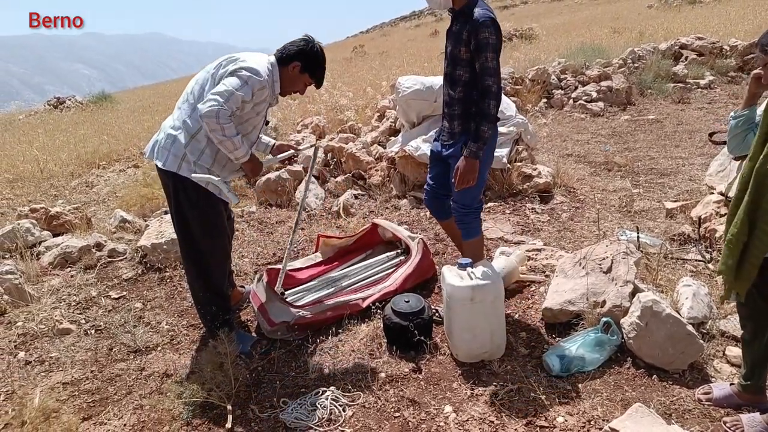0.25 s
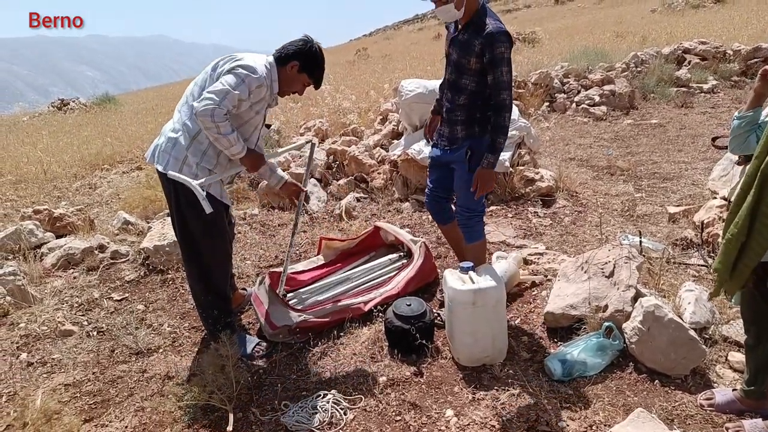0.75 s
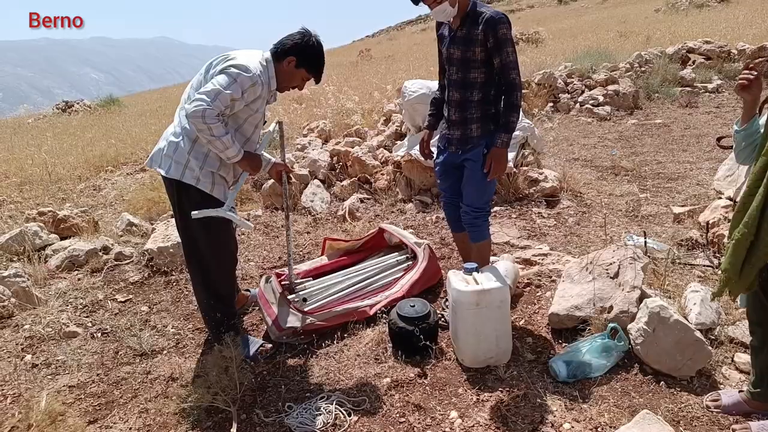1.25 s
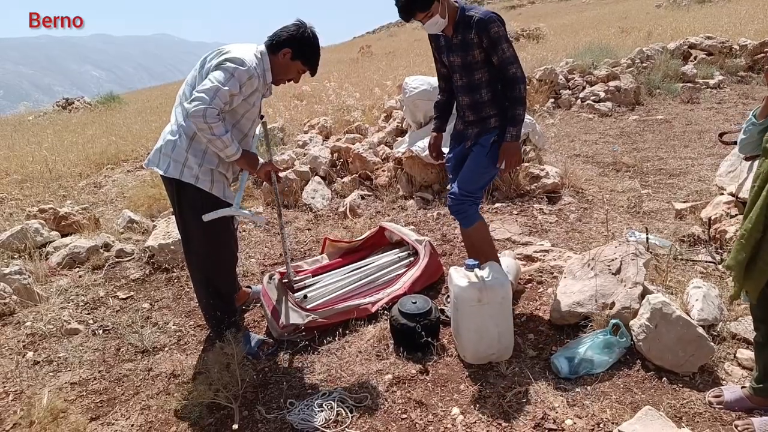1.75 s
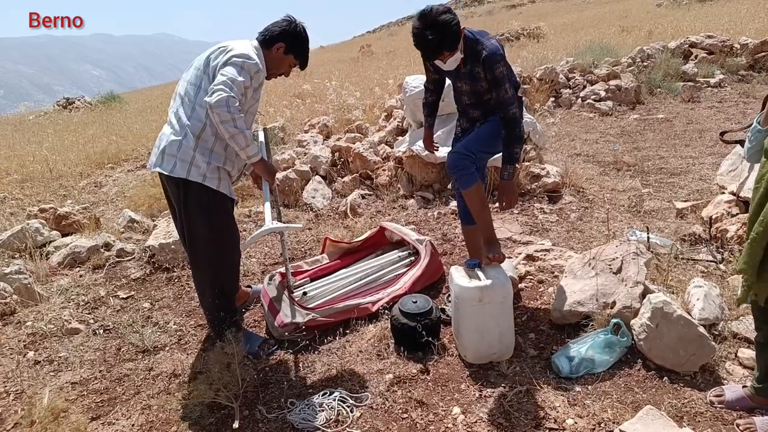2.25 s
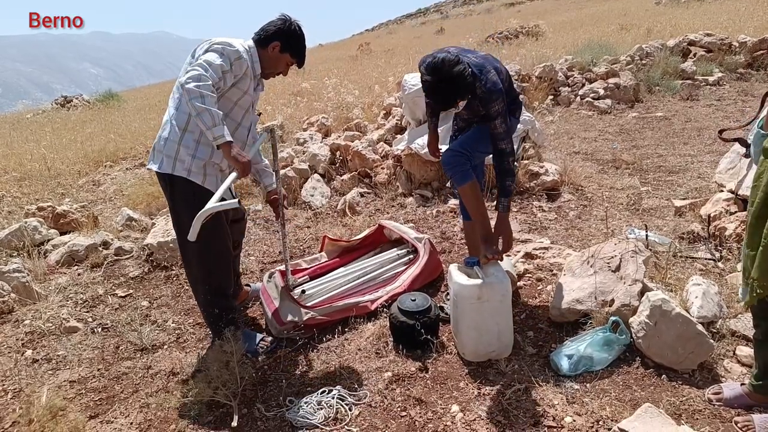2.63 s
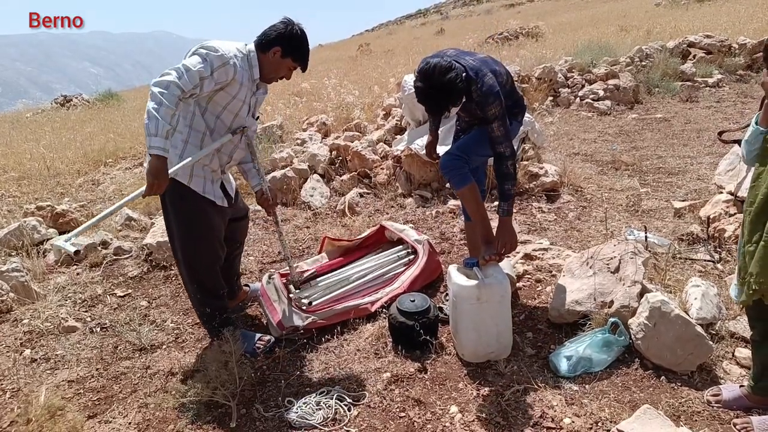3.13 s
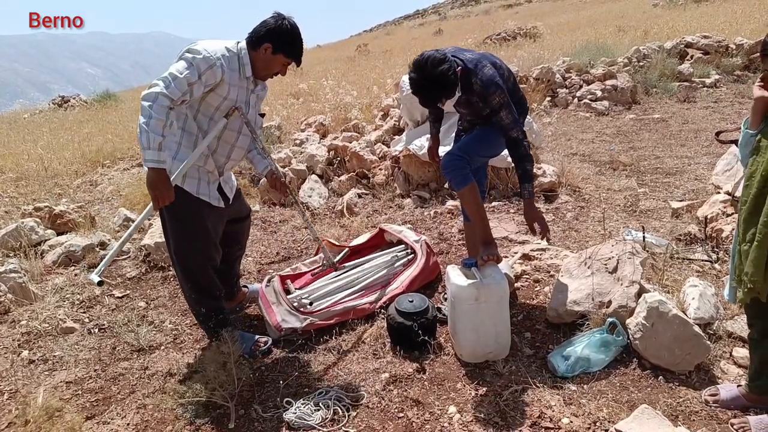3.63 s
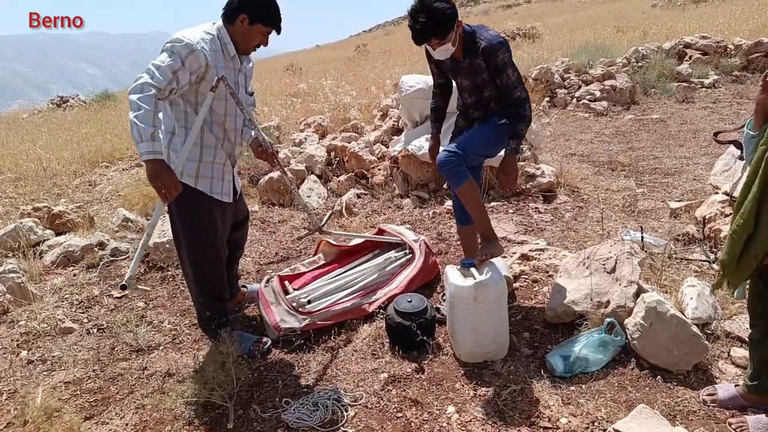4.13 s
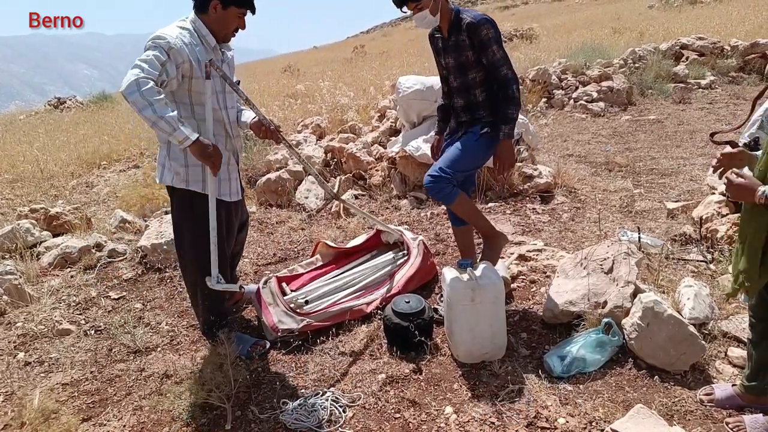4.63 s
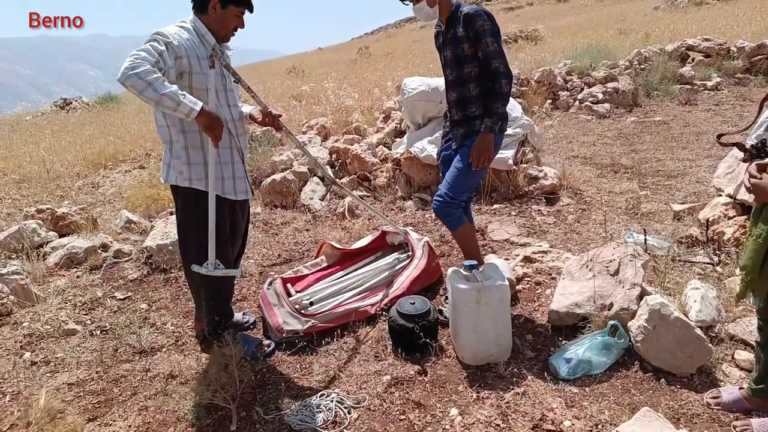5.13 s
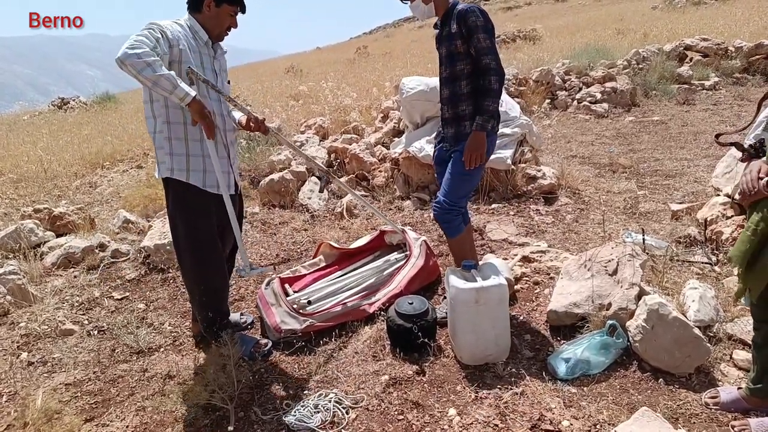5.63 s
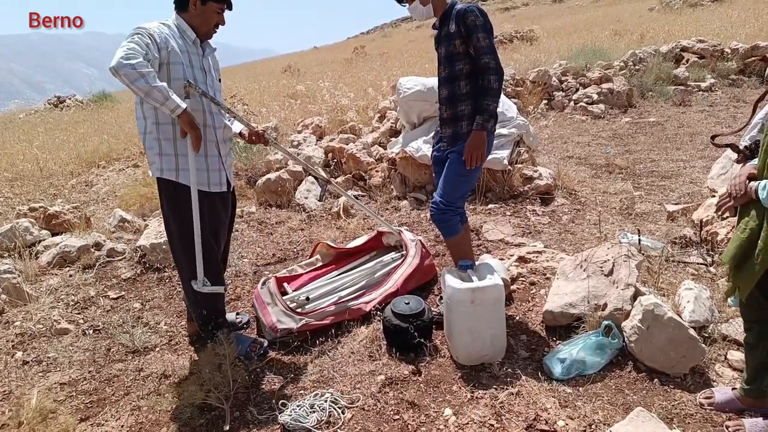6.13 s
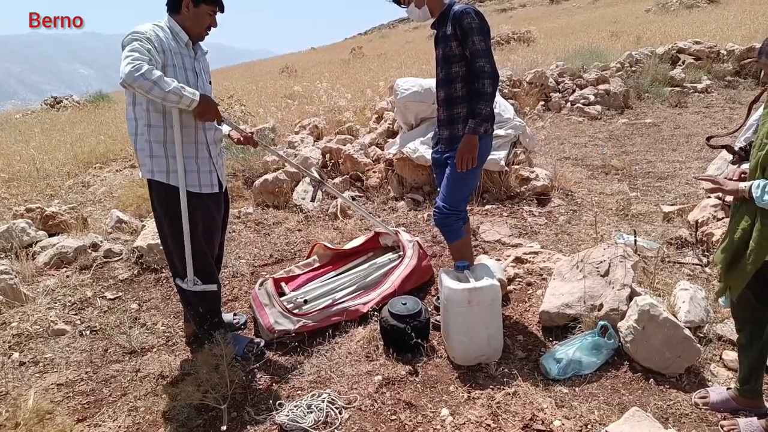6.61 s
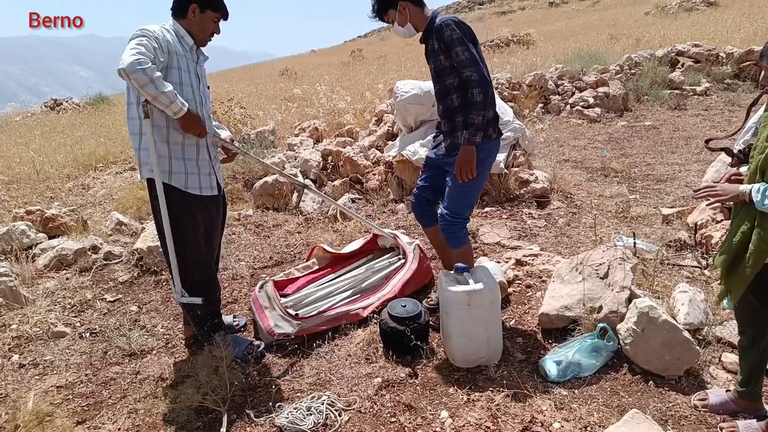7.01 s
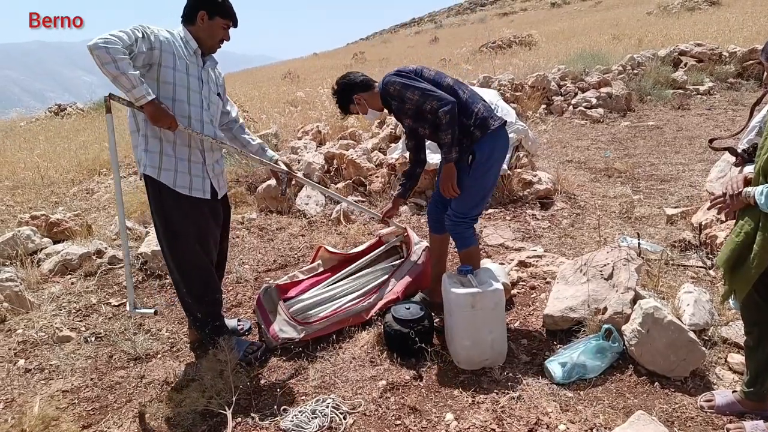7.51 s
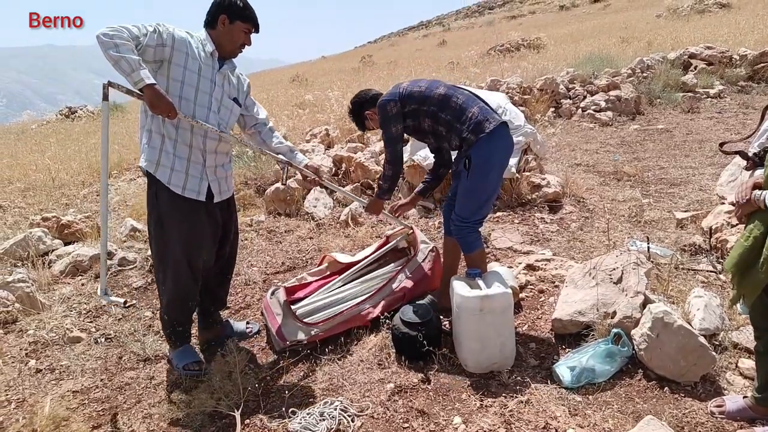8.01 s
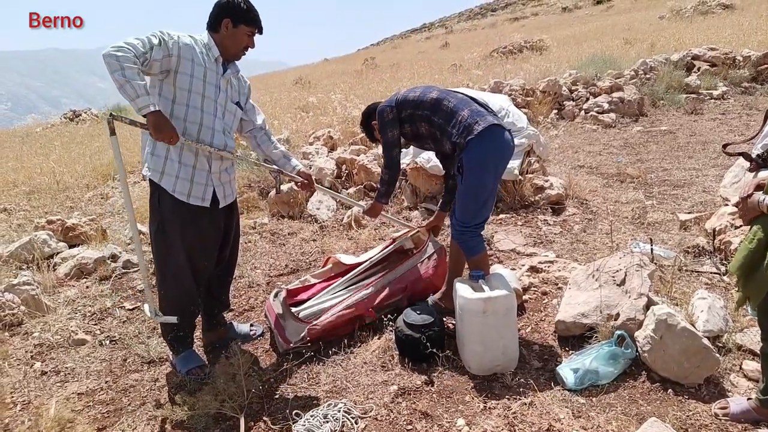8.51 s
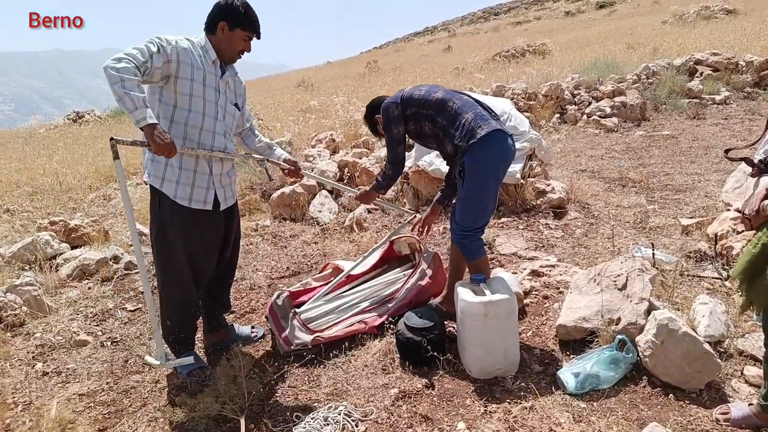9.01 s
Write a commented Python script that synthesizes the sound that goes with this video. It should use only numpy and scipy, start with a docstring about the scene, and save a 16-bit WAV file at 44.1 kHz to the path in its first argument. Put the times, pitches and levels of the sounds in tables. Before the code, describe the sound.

Hollow metal poles are handled on an open stony hillside, heard by a phone microphone nearby. At the start poles slide and rattle softly, with a clink at 0.2 s and a dull bump. Two bright knocks and a scrape come at 1.1-1.3 s, then a lighter clink at 1.6. Wind rumbles unevenly, thumping hardest around 2.3-2.4 s. At 3.0 s the loudest clank rings briefly, followed by a busy clatter and a sharp scrape until 3.65. Sparser clinks follow around 4.3; a high, thin tick at 5.0. Scrapes and bright clinks cluster from 5.5 to 6.1. Stalks snap at 6.3 as tubes squeak faintly, squeaking again near 7. A knock falls at 7.2, then dry crackles and dull bumps from 7.6 to 8.3, with light clinks and a last knock at 8.8. The wind calms, leaving faint rustle and a soft low bump near 9.

```python
"""On an open, stony hillside, hollow metal tent poles are drawn from a canvas bag and fitted together.
Knocks, rattles and scrapes set ringing filters of the tubes going; rubbed tubes squeak as wavering tones.
Dry stalks snap as short noise bursts, and dull bumps are dying bursts of low noise.
Wind buffets the two ports of a phone microphone as lumpy rumble and single thumps, over a faint rustle."""
import sys
import numpy as np
from scipy import signal
from scipy.io import wavfile

SR = 44100
rng = np.random.default_rng(int(sys.argv[2]) if len(sys.argv) > 2 else 0)


def digitize_waveform(pressure):
    """Quantize a signal to 16-bit integers and store it at the path in sys.argv[1].

    Rows of a 2-D input are taken as channels; values are limited to [-1, 1].
    """
    field = np.atleast_2d(pressure).T
    bounded = np.clip(field, -1, 1)
    quanta = np.round(bounded * 32767).astype(np.int16)
    wavfile.write(sys.argv[1], SR, quanta)


def undo_db(level):
    """Turn decibels back into plain size, where 20 dB means ten times bigger."""
    steps = np.asarray(level, float) / 20
    return 10 ** steps


N = 408366

# where the low, bright and top registers meet: edge_hz
REGISTER_EDGES_HZ = [4300, 8700]
# shift of the left port in the low, bright and top register, negative when it hears first: lag_samples
LEFT_LAG_SAMPLES = [-3, -2, -4]


def rms_one(x):
    """Scale to unit rms."""
    return x / np.sqrt(np.mean(x ** 2) + 1e-20)


def in_time(rows):
    """Columns of a curve table at every sample."""
    s, *columns = np.transpose(rows)
    return [np.interp(np.arange(N) / SR, s, column) for column in columns]


def at_hz(points, hz):
    """Read a spectrum on a log-frequency axis."""
    point_hz, point_db = np.array(points).T
    return np.interp(np.log(hz), np.log(point_hz), point_db)


def drift(rate_hz):
    """Slow random wandering around 0 with spread 1; a higher rate wanders faster."""
    r = np.exp(-80 * np.pi * rate_hz / SR)   # one step every 40 samples
    slow = signal.lfilter([1], [1, -2 * r, r * r], rng.standard_normal(N // 40 + 2002))[2000:]
    return np.interp(np.arange(N) / 40, np.arange(len(slow)), rms_one(slow - slow.mean()))


def band(low_hz, high_hz):
    """Band-pass filter sections."""
    return signal.butter(2, [low_hz, high_hz], "band", fs=SR, output="sos")


def mode(hz, t60):
    """One ringing mode as a filter section; it fades by 60 dB in t60 seconds."""
    r, w = undo_db(-60 / (t60 * SR)), 2 * np.pi * hz / SR
    return np.array([[0.024, np.sin(w), 0.036, 1, -2 * r * np.cos(w), r * r]])


def place(times, shapes):
    """Lay one short shape at each time."""
    starts = np.round(np.asarray(times) * SR).astype(int)
    at = (starts[:, None] + np.arange(shapes.shape[1])).ravel()
    return np.bincount(at, shapes.ravel(), N + shapes.shape[1])[:N]


def grit(spread_db, shape):
    """Dense uneven micro-contacts; rms 1."""
    unevenness = np.minimum(rng.exponential(1, shape), 4)
    return rms_one(rng.standard_normal(shape) * undo_db(spread_db * unevenness))


def to_ports(near, register, scatter_db, t60, pan_db=0):
    """Direct sound a few samples apart, plus each port's own scatter off the stones, changing as poles move."""
    moves_hz, move_rad = 1.5, 2.5   # how fast and how far the echo paths change
    t = np.arange(SR // 10) / SR
    stones = rng.standard_normal((2, 2, len(t))) * undo_db(-60 * t / t60)
    stones *= undo_db(scatter_db) / np.sqrt(np.sum(stones ** 2, axis=2, keepdims=True))
    direct = np.array([np.roll(near, LEFT_LAG_SAMPLES[register]), near])
    # the echo turns back and forth between two sets of paths
    turn = move_rad * drift(moves_hz)
    here = signal.oaconvolve((near * np.cos(turn))[None], stones[0], axes=1)[:, :N]
    there = signal.oaconvolve((near * np.sin(turn))[None], stones[1], axes=1)[:, :N]
    pan = undo_db([[pan_db / 2], [-pan_db / 2]])
    return (direct + here + there) * pan / np.hypot(1, undo_db(scatter_db))


def port_step(below, above):
    """The port resonance ends sharply: what lies under it is cut at its edge, the top starts just above."""
    edge = REGISTER_EDGES_HZ[1]
    cut = signal.sosfilt(signal.ellip(8, 1, 40, edge - 250, fs=SR, output="sos"), below)
    return cut + signal.sosfilt(signal.cheby2(4, 14, edge, "high", fs=SR, output="sos"), above)


def rubbing(flutter_db, top_db):
    """Force of sliding, rattling and scraping in the three registers."""
    # poles sliding in the bag and in the hands: time_s, bright_db
    sliding = [(0.0, -48), (0.15, -52), (0.62, -63), (1.03, -75), (1.19, -52.5), (1.83, -67), (2.4, -72),
               (2.55, -61.5), (2.82, -71), (3.12, -53), (3.74, -60.5), (5.9, -61), (6.22, -52.5),
               (6.86, -63.5), (7.09, -56), (7.66, -58), (9.26, -60.5)]
    # short scrapes of tube along tube, swelling and fading: middle_s, bright_db, low_db, half_length_s
    scrapes = [(0.287, -50.5, -54, 0.11), (1.149, -39.5, -44, 0.093), (1.326, -45, -52, 0.07),
               (3.531, -33, -32.5, 0.027), (5.488, -43.5, -60, 0.025), (5.561, -46, -83, 0.023),
               (5.629, -48.5, -58, 0.014), (5.884, -39, -44, 0.025), (5.982, -34, -45, 0.021),
               (6.033, -42, -46, 0.087), (6.411, -39, -64, 0.039), (7.494, -46, -59, 0.068),
               (7.971, -42.5, -52, 0.023), (8.035, -48, -49.5, 0.1)]
    slide_low_db = -6   # low register against bright
    # loose poles tick while they slide: this often at the mean sliding level, more often the harder
    rattles_per_s, rate_db_per_db = 12, 1
    rattle_db, rattle_spread_db, rattle_t60_s = -7, 6, 0.099   # levels against the sliding

    slide_db, = in_time(sliding)
    chance = rattles_per_s * undo_db(rate_db_per_db * (slide_db - slide_db.mean())) / SR
    ticks = rng.random((2, N)) < chance
    tick_db = rattle_db + rattle_spread_db * np.minimum(rng.exponential(1, (2, N)), 3)
    fade = undo_db(-60 / (rattle_t60_s * SR))
    rattle = 1 + signal.lfilter([1], [1, -fade], ticks * undo_db(tick_db) + 1e-18)
    steady_bright, steady_low = undo_db(slide_db + [[0], [slide_low_db]]) * rattle

    middle, bright_db, low_db, half = np.transpose(scrapes)
    t = np.arange(SR // 2) / SR
    swell = np.exp(-((t - 2 * half[:, None]) / half[:, None]) ** 2)
    bright = steady_bright + place(middle - 2 * half, swell * undo_db(bright_db)[:, None])
    low = steady_low + place(middle - 2 * half, swell * undo_db(low_db)[:, None])
    flutter = undo_db(flutter_db * drift(39.6))   # the grip on the tubes is unsteady
    return [low * flutter, bright * flutter, bright * flutter * undo_db(top_db)]


def tube_body(crack_db, twin):
    """Tube filters as (Hz, sections, gain, is a ring); unit noise gives rms 1 in each register."""
    # rings of the tubes: pitch_hz, gain_db, t60_s
    rings = [(636, -7, 0.0214), (1180, -8.5, 0.076), (1268, -1.5, 0.028), (1621, -11, 0.075),
             (1803, -1.5, 0.021), (2330, -9, 0.085), (2473, -18, 0.049), (2778, -10, 0.14),
             (2825, -5.5, 0.023), (3450, -9.5, 0.092), (4040, -18, 0.41), (4680, -11.5, 0.18),
             (6210, -7, 0.16), (6638, 7, 0.036), (7160, 5, 0.052), (7440, 5.5, 0.034), (8420, 5, 0.035)]
    # crowded short modes of the tube walls, heard as a crack: pitch_hz, density_db (per Hz, relative)
    crack = [(500, -16), (870, -46), (1200, -13), (1500, -32.5), (2500, -2), (3700, -8), (7000, 1.5),
             (8300, -7.5), (9500, -26), (15500, -31.5)]
    body = []
    for hz, db, t60 in rings:
        # the two tubes that touch are not quite alike, so every ring has a close twin
        for detune in (1, 1 + twin):
            body.append((hz, mode(hz * detune, t60), undo_db(db), 1))
    edges = np.r_[np.geomspace(450, REGISTER_EDGES_HZ[1], num=13), 11000, 13500, 17000]
    for a, b in zip(edges, edges[1:]):
        middle_hz = np.sqrt(a * b)
        body.append((middle_hz, band(a, b), undo_db(at_hz(crack, middle_hz) + crack_db), 0))

    click, power = signal.unit_impulse(SR // 2), np.zeros(3)
    for hz, sos, gain, ring in body:
        power[np.searchsorted(REGISTER_EDGES_HZ, hz)] += np.sum((gain * signal.sosfilt(sos, click)) ** 2)
    return [(hz, sos, gain / np.sqrt(power[np.searchsorted(REGISTER_EDGES_HZ, hz)]), ring)
            for hz, sos, gain, ring in body]


def poles(crest_db, chance_db, favour_db, favour_width, chatter_t60, slide_ring_db):
    """Knocks and sliding shake the same tubes; the spot struck favours one ring and those an octave away."""
    # pole on pole: time_s, peak_db (bright register), low_db (low register against peak), loudest_ring_hz
    knocks = [(0.184, -19, -30, 2660), (0.9881, -30.5, -15, 2756), (1.076, -15, -27, 2780),
              (1.1627, -16, -13.5, 2850), (1.541, -39.5, -4, 2330), (1.586, -47, 2, 1800),
              (1.609, -45, -3, 1190), (1.6218, -25.5, -11.5, 2314), (1.668, -49.5, 1, 1196),
              (2.006, -35, -7, 1250), (2.187, -44, -9, 2360), (2.4907, -33.5, -26, 2760),
              (2.9576, -32.5, -10, 2330), (2.9957, -8.5, -17.5, 1621), (3.1783, -30.5, -8, 1184),
              (3.189, -28.5, -5, 2326), (3.2967, -21.5, -15.5, 1630), (3.4128, -27, -10.5, 1627),
              (3.451, -19.5, -14.5, 1800), (3.5455, -15, -12.5, 2825), (3.631, -24.5, -14.5, 1247),
              (3.922, -32.5, -25, 2850), (4.057, -45, -13.5, 6638), (4.3059, -28.5, -17.5, 1250),
              (4.3345, -33.5, -8.5, 1310), (4.69, -46, -40, 6638), (4.7784, -39, -21, 2830),
              (4.9569, -15.5, -54, 7440), (5.578, -35.5, -33, 7400), (5.842, -19.5, -62, 6320),
              (5.9316, -33, -18, 2825), (6.076, -30, -24, 2330), (6.11, -27, -22.5, 2825),
              (7.031, -49.5, -9.5, 1180), (7.116, -40, -13, 3390), (7.2195, -21, -16, 1100),
              (7.4526, -29, -27.5, 2700), (7.618, -38.5, -15.5, 1790), (7.764, -34, -18, 3000),
              (7.997, -26, -38, 2830), (8.1177, -32, -14, 3450), (8.8166, -28, -14.5, 2820)]
    # light taps that part sooner, with the same columns: time_s, peak_db, low_db, loudest_ring_hz
    taps = [(0.118, -36, -7.5, 2473), (3.151, -50, 4.5, 1803), (3.348, -46, 0, 1621),
            (3.485, -36, -5.5, 1180), (3.9, -57.5, 5, 1180), (3.999, -48.5, -1, 2825),
            (4.889, -38.5, -8, 2825), (5.2827, -51, 4, 2825)]
    tap_t60_s = 0.031
    # a glancing knock has little low ring and much top, up to a limit against the peak
    top_db, top_per_low, top_most_db = -38.5, 0.81, -19
    slide_tilt_db = 5   # sliding wakes deep sounds less than a blow: dB an octave below the bright register

    s, peak_db, low_db, spot_hz = np.transpose(list(knocks) + list(taps))
    top_re_peak_db = np.minimum(top_db - top_per_low * low_db, top_most_db)
    knock_db = [peak_db + low_db, peak_db - crest_db, peak_db + top_re_peak_db]
    slide = rubbing(flutter_db=2.24, top_db=-14.5)

    # first contact, chatter, then the bundle settles more slowly
    t = np.arange(SR // 6) / SR
    lasts = np.repeat([chatter_t60, tap_t60_s], [len(knocks), len(taps)])[:, None]
    first_contact = 3.03 * undo_db(-60 * t / 0.0004)
    chatter = first_contact + undo_db(-60 * t / lasts) + undo_db(-21 - 60 * t / (6.86 * lasts))

    contacts = grit(3.0, (3, N))
    # the sliding spot wakes other rings as it moves
    shifting = [undo_db(slide_ring_db + 4.5 * drift(9.9)) for group in range(4)]
    out = np.zeros((3, N))
    for k, (hz, sos, gain, ring) in enumerate(tube_body(crack_db=39.5, twin=0.0231)):
        register = np.searchsorted(REGISTER_EDGES_HZ, hz)
        near_spot = sum(np.exp(-(np.log(hz / spot_hz / octave) / favour_width) ** 2) for octave in (.5, 1, 2))
        ring_db = chance_db * rng.standard_normal(len(s)) + favour_db * near_spot
        blows = place(s, chatter * undo_db(knock_db[register] + ring * ring_db)[:, None])
        tilt = undo_db(slide_tilt_db * min(np.log2(hz / REGISTER_EDGES_HZ[0]), 0))
        sliding = slide[register] * tilt * (shifting[k // 2 % 4] if ring else 1)
        out[register] += signal.sosfilt(sos, gain * (blows + sliding) * contacts[k % 3])

    low = to_ports(out[0], register=0, scatter_db=-7, t60=0.05, pan_db=1.5)
    bright = to_ports(out[1], register=1, scatter_db=2, t60=.04, pan_db=0)
    top = to_ports(out[2], register=2, scatter_db=39.0, t60=0.045, pan_db=2.5)
    return port_step(low + bright, top)


def port_gains(level_db, pan_db):
    """Levels at two unrelated ports whose mean has the given level."""
    left = 2 * undo_db(level_db) / np.sqrt(1 + undo_db(-2 * pan_db))
    return np.array([left, left * undo_db(-pan_db)])


def thump(hz, cycles):
    """A few swelling and fading cycles, one row a pitch."""
    turns = np.arange(SR // 8) / SR * hz[:, None]
    return np.sin(2 * np.pi * turns) * np.sin(np.pi * np.clip(turns / cycles, 0, 1)) ** 2


def wind(lumps_db, cycles, brighten):
    """Lumpy rumble, own in each port and brighter in gusts, and single strong eddies that thump."""
    # strength on the ports: time_s, level_db
    strength = [(0.0, -50.5), (0.13, -54.5), (0.8, -41.5), (1.0, -43), (1.75, -49), (1.88, -40),
                (2.14, -47), (2.37, -38), (2.73, -56.5), (3.43, -40), (4.9, -63.5), (5.03, -44), (5.2, -50),
                (5.42, -58.5), (5.6, -74.5), (6.35, -56.5), (6.85, -68.5), (7.35, -44), (7.58, -57),
                (8.4, -59), (8.95, -54), (9.26, -64)]
    # eddies on one port: start_s, peak_db (about, mean of the ports), pitch_hz, port (0 left, 1 right)
    puffs = [(0.036, -26.5, 130, 0), (1.405, -30, 117, 1), (1.84, -31, 240, 1), (2.292, -20.5, 219, 1),
             (2.43, -25, 187, 1), (0.702, -27, 173, 1), (2.387, -18.5, 205, 1), (3.635, -29, 205, 1),
             (5.013, -27, 135.5, 0), (7.408, -31, 148, 1), (7.874, -33.5, 138, 1)]
    # the right port faces the wind: left-right dB falls with strength above calm, and veers
    calm_db, lean_per_db, veer_db = -71, 0.49, 5.5
    # stronger wind is brighter: dB an octave per dB above the mean
    mean_wind_db, brighter_per_db = -45, 0.22

    level_db, = in_time(strength)
    pan_db = veer_db * drift(0.32) - lean_per_db * np.maximum(level_db - calm_db, 0)
    rumble, gusts = np.zeros((2, N)), np.array([drift(7.2), drift(32.4)])
    for low_hz, high_hz, band_db in [(68.3, 138.3, 1), (115.6, 228.6, -4.0), (263, 324, -17.5)]:
        noise = signal.sosfilt(band(low_hz, high_hz), rng.standard_normal((2, N)))
        lumps = lumps_db * np.array([drift(9.7), drift(14.3)])
        octaves = np.log2(low_hz / 65)
        gust_db = (1.0 + brighten * octaves) * gusts
        brighter_db = brighter_per_db * octaves * (level_db - mean_wind_db)
        rumble += noise * undo_db(band_db + lumps + gust_db + brighter_db)
    out = rms_one(rumble) * port_gains(level_db, pan_db)

    s, peak_db, hz, port = np.transpose(puffs)
    eddies = 2 * thump(hz, cycles) * undo_db(peak_db)[:, None]   # doubled, as only one port has it
    return out + np.array([place(s, eddies * (np.round(port) == k)[:, None]) for k in range(2)])


def hillside_air(patchy_db):
    """Far rustle of grass and air: noise in narrow bands whose levels wander."""
    # open hillside: pitch_hz, density_db (per Hz, relative)
    air = [(250, -7.5), (823, -18), (1400, -25.5), (7240, -23), (8930, -37), (15100, -32)]
    air_db = -59.5   # rms of the whole rustle
    edges = np.r_[np.geomspace(200, REGISTER_EDGES_HZ[1], num=13), 12000, 17000]
    white, together, out = rng.standard_normal((2, N)), drift(0.46), np.zeros((2, N))
    for k, (a, b) in enumerate(zip(edges, edges[1:])):
        hz = np.sqrt(a * b)
        gain = undo_db(at_hz(air, hz) + patchy_db * (together + drift(20.0)))
        out[int(hz > REGISTER_EDGES_HZ[1])] += gain * signal.sosfilt(band(a, b), white[k % 2])
    below = to_ports(out[0], register=1, scatter_db=7.5, t60=0.025)
    above = to_ports(out[1], register=2, scatter_db=7.5, t60=0.025)
    return undo_db(air_db) * rms_one(port_step(below, above))


def thuds(low_hz, high_hz):
    """Dull bumps, a dying burst of low noise, reach both ports alike."""
    # bumps on ground or bag: start_s, level_db (before the band-pass), t60_s
    bumps = [(0.165, -31.5, 0.54), (6.188, -38, 0.082), (8.052, -25, 0.059), (8.207, -26, 0.054),
             (8.535, -36, 0.069), (8.955, -37, 0.78)]
    s, level_db, t60 = np.transpose(bumps)
    t = np.arange(SR // 4) / SR
    burst = rng.standard_normal((len(s), len(t))) * undo_db(level_db[:, None] - 60 * t / t60[:, None])
    return signal.sosfilt(band(low_hz, high_hz), place(s, burst))


def stalks(t60, treble_lift_db):
    """A snap is a crack of a few milliseconds: a dull part and a treble part."""
    # snapping stalks: start_s, level_db (before the band-pass), treble_db (against level, before the lift)
    snaps = [(6.268, -20.5, -23), (6.3254, -17.5, -15), (7.633, -18, -25), (7.669, -21, -24),
             (7.729, -17, -19), (7.853, -11.5, -31), (8.058, -12, -30), (8.0941, -13.5, -35),
             (8.213, -10.5, -18.5), (8.288, -20.5, -33)]
    s, level_db, treble_db = np.transpose(snaps)
    t = np.arange(SR // 30) / SR
    burst = rng.standard_normal((2, len(s), len(t))) * undo_db(-60 * t / t60)
    dull_cracks = place(s, burst[0] * undo_db(level_db)[:, None])
    treble_cracks = place(s, burst[1] * undo_db(level_db + treble_db + treble_lift_db)[:, None])
    dull = signal.sosfilt(band(5450, 7500), dull_cracks)
    treble = signal.sosfilt(band(5300, 21000), treble_cracks)
    return port_step(to_ports(dull, register=1, scatter_db=-10, t60=.04),
                     to_ports(treble, register=2, scatter_db=-10, t60=.04))


def singing_tube():
    """Friction holds one mode of a rubbed tube singing: a sagging tone roughened by slow noise."""
    # tube rubbed along another: start_s, length_s, level_db, pitch_hz, half_width_hz
    squeaks = [(6.335, 0.14, -52, 3020, 60), (6.356, 0.13, -53, 3380, 80), (6.88, 0.26, -53.5, 2777, 22),
               (6.961, 0.18, -59, 2580, 50), (7.154, 0.079, -56, 2670, 60)]
    fade_s, sag_per_s = 0.048, 0.052   # it swells until this last fade; share of the pitch lost a second
    out, t = np.zeros(N), np.arange(N) / SR
    for start, length, db, hz, half_width_hz in squeaks:
        since = np.clip(t - start, 0, length)
        slow = signal.butter(2, half_width_hz, fs=SR, output="sos")
        rough = rms_one(signal.sosfilt(slow, grit(5.6, (2, N))))
        turn = 2 * np.pi * hz * since * (1 - sag_per_s * since / 2)
        shape = np.minimum(since / (length - fade_s), (length - since) / fade_s)
        out += undo_db(db) * shape ** 0.79 * (rough[0] * np.sin(turn) + rough[1] * np.cos(turn))
    return np.array([np.roll(out, LEFT_LAG_SAMPLES[0]), out])


def scene():
    """All sources at the two ports."""
    metal = poles(crest_db=8.0, chance_db=3.0, favour_db=11.5, favour_width=0.022,
                  chatter_t60=0.077, slide_ring_db=-4.5)
    gusts = wind(lumps_db=7.0, cycles=1.79, brighten=0.78)
    air = hillside_air(patchy_db=3.5)
    bumps = thuds(low_hz=225, high_hz=685)
    snaps = stalks(t60=0.0045, treble_lift_db=10.5)
    return metal + gusts + air + bumps + snaps + singing_tube()


def roll_off(x):
    """The treble ends steeply here."""
    return signal.sosfilt(signal.butter(12, 16990, fs=SR, output="sos"), x)


def record(dry):
    """The phone cuts the deepest bass and the very top."""
    no_deep_bass = signal.sosfilt(signal.butter(4, 68, "high", fs=SR, output="sos"), dry)
    mix = signal.sosfilt(signal.cheby2(10, 60, 17100, fs=SR, output="sos"), no_deep_bass)
    return roll_off(mix)


dry = scene()
out = record(dry)
digitize_waveform(out)
```